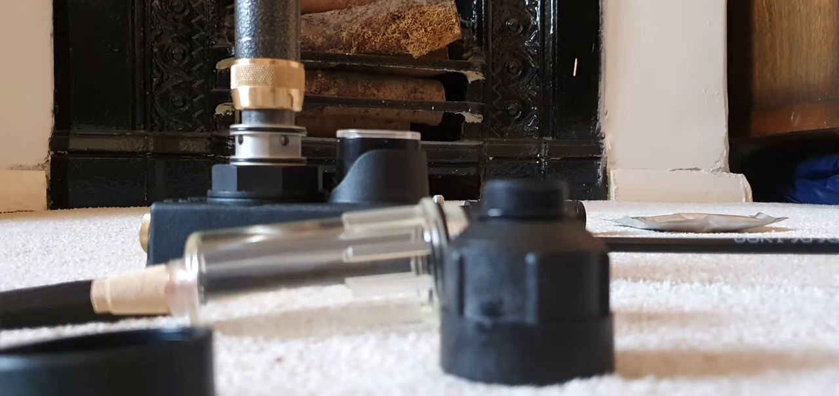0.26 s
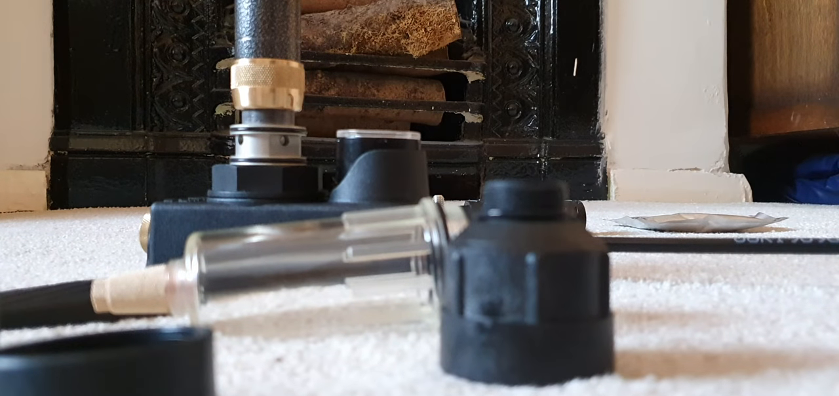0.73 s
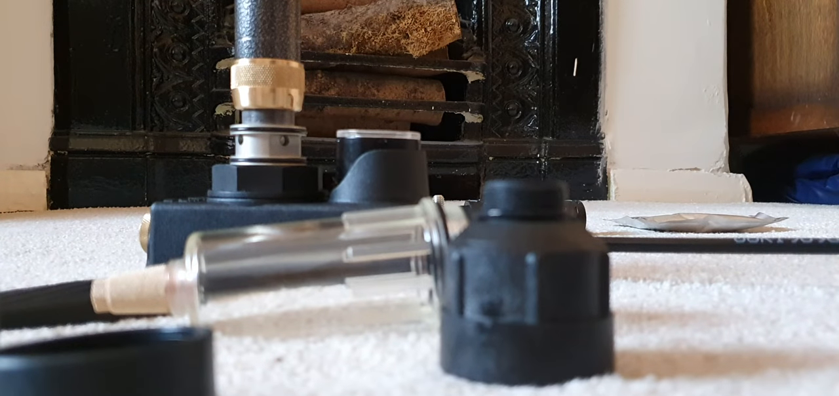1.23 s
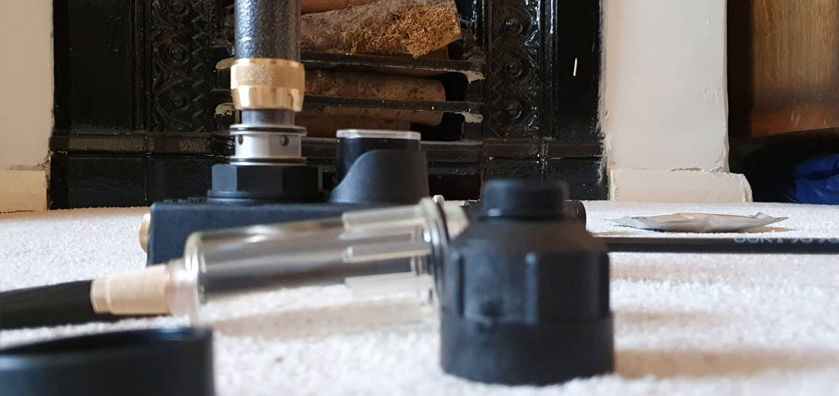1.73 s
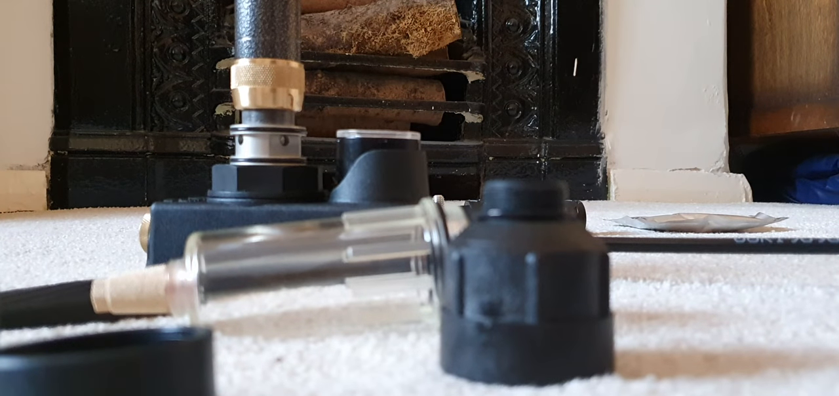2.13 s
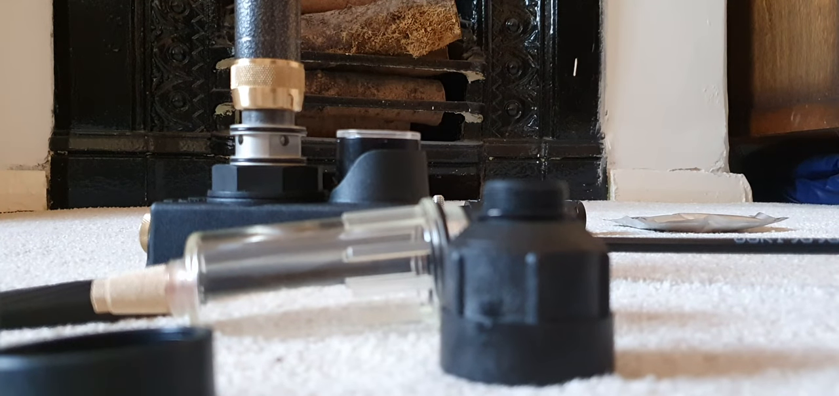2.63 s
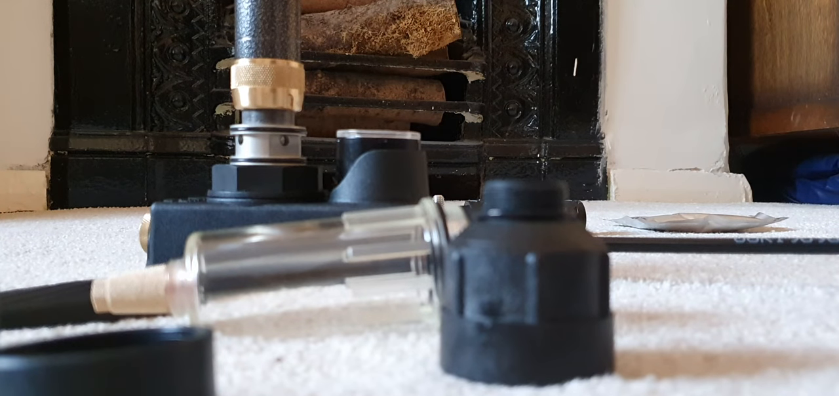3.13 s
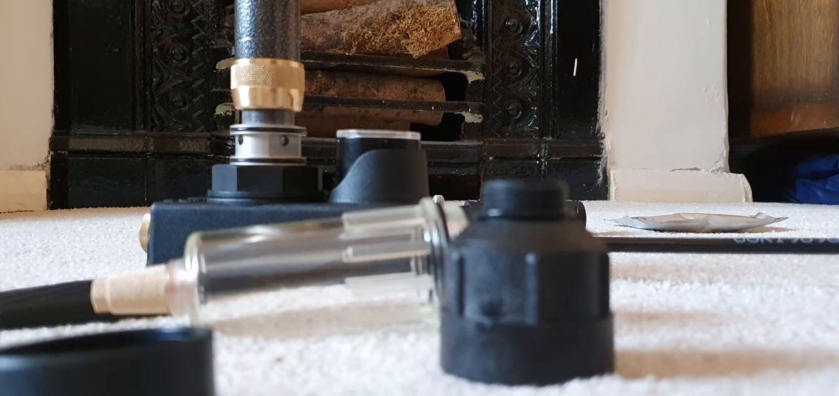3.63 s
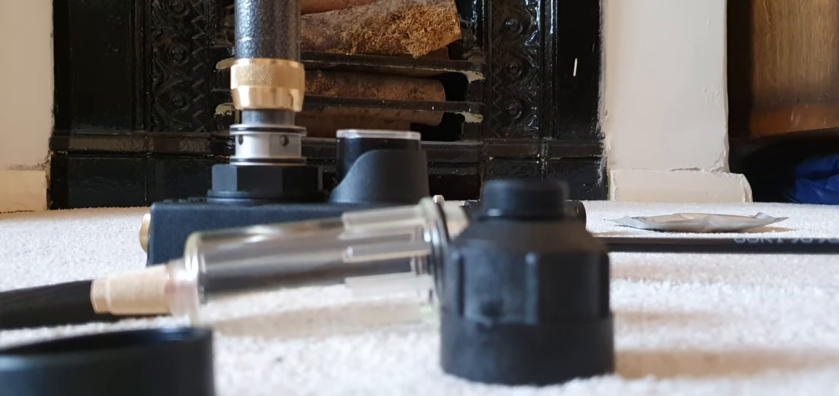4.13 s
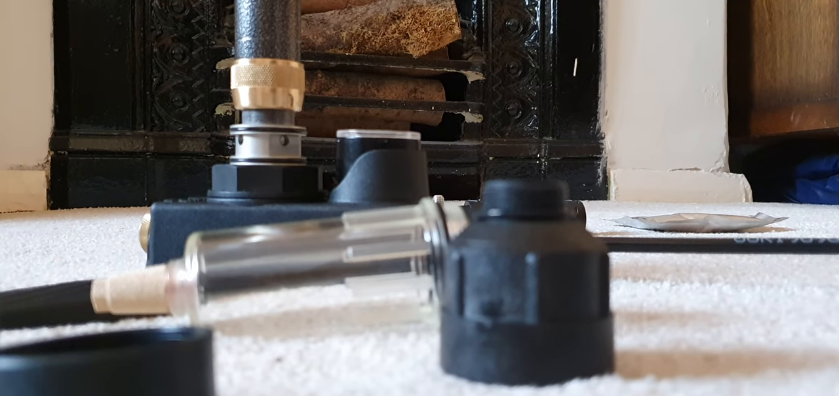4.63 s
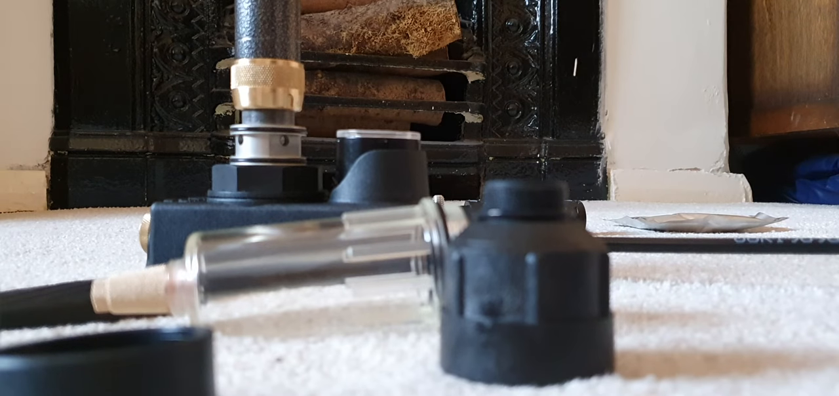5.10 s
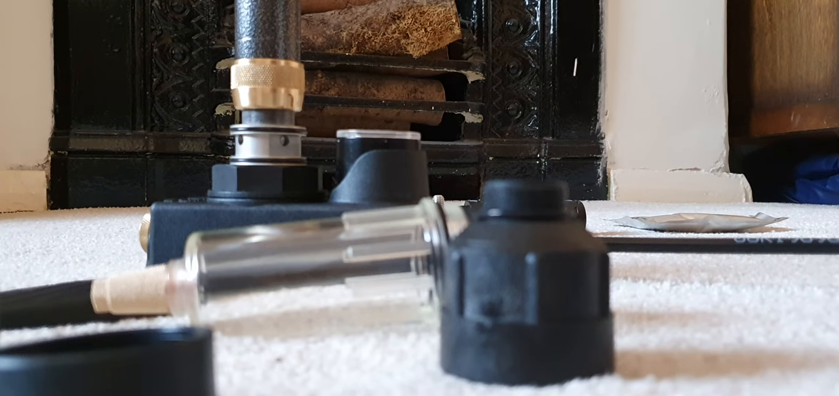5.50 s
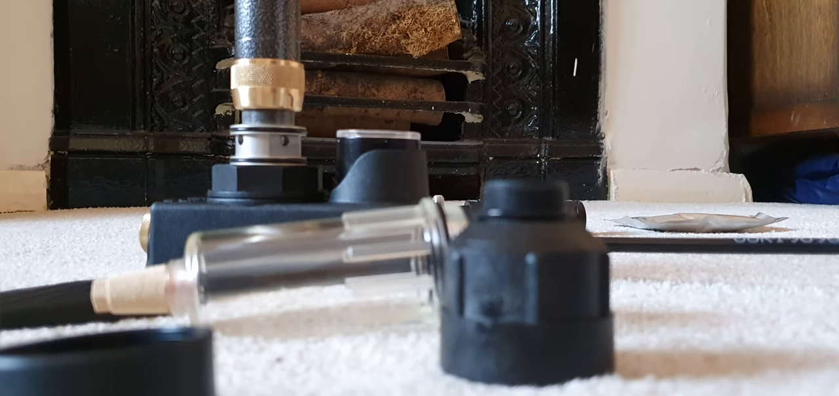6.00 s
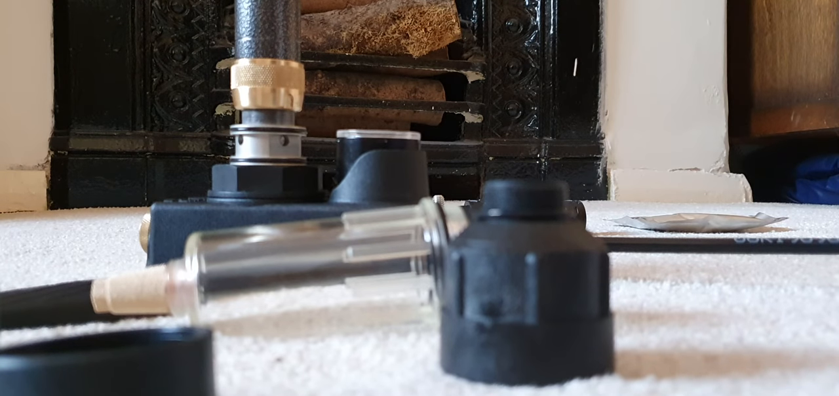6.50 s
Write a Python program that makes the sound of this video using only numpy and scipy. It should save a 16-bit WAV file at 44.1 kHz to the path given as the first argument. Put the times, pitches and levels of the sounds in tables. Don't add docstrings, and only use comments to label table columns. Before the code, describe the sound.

A stiff foil sachet is handled close to a stereo microphone on carpet in a small, quiet room. From 0 to 1.2 s, bright dry snaps stand out over short crackly rubs and tiny creases. Around 1.4-1.7 s the seam rips in dense, jerky bursts with a hollow pouch pop. Lighter rustling follows, with a sharp crack near 2.2 s and a hard cluster of creases at 2.8-3.0 s. From 3.1 to 3.9 s it is almost still, only faint film shifting. A second tear erupts at 4.0-4.5 s, loudest near 4.35 s, crackling and fizzing. Then sparse, soft settling crinkles, a small snap at 5.45 s, light rubbing from 5.9 s, a sharp crack at 6.25 s and a short final pull near 6.5 s. The left side sounds slightly later and duller. Low, beating motor hum, soft rumble, faint hiss and an intermittent thin whine lie underneath.

```python
import sys
import numpy as np
from scipy import signal
from scipy.fft import rfft, irfft, next_fast_len
from scipy.io import wavfile
from scipy.ndimage import map_coordinates

SR = 44100
rng = np.random.default_rng(int(sys.argv[2]) if len(sys.argv) > 2 else 0)


def how_loud(loudness_db):
    steps = np.asarray(loudness_db, float) / 20
    return 10 ** steps


def pcm_store(signal):
    levels = np.round(np.clip(np.atleast_2d(signal), -1, 1) * 32767)
    wavfile.write(sys.argv[1], SR, levels.astype(np.int16).T)


N = 297675


def unit(x):
    return x / np.sqrt(np.mean(x ** 2) + 1e-20)


def peak(x):
    return x / np.abs(x).max()


def along(points, hz):
    f, v = np.transpose(points)
    return np.interp(np.log(hz + 1), np.log(f + 1), v)


def curves(rows, t=None):
    s, *cols = np.transpose(rows)
    when = np.arange(N) / SR if t is None else t
    return [np.interp(when, s, c) for c in cols]


def wobble(rate):
    t = np.arange(0, N + 64, 32)
    knots = rng.standard_normal(N // 100)
    curve = map_coordinates(knots, [t * np.clip(rate, .1, 400) / SR])
    return np.interp(np.arange(N), t, curve)


def causal(colour, size):
    cep = irfft(np.log(how_loud(along(colour, np.fft.rfftfreq(size, 1 / SR)))), size)
    cep[1:size // 2] *= 2
    cep[size // 2 + 1:] = 0
    return np.exp(rfft(cep))


def coloured(x, colour):
    return signal.fftconvolve(x, irfft(causal(colour, size=1024))[None], axes=1)[:, :N]


def resonance(f, hz, width):
    damping = 1j * f * width * hz
    return damping / (hz * hz - f * f + damping)


# f/Hz, likeness/0-1
LIKENESS = [(60, 1), (400, 0.58), (1500, 0.095)]


def still_air(colour):
    m = next_fast_len(N)
    hz = np.fft.rfftfreq(m, 1 / SR)
    turn = np.arccos(np.clip(along(LIKENESS, hz), -1, 1)) / 2
    noise = rfft(rng.standard_normal((2, m))) * how_loud(along(colour, hz))
    mid, side = irfft(noise * [np.cos(turn), np.sin(turn)], m)[:, :N]
    return unit(np.array([mid + side, mid - side]))


# f/Hz, level/dB per Hz
RUMBLE_COLOUR = [(30, -10), (65, 0.48), (95, 0.02), (135, -10), (220, -4), (450, -13), (800, -17),
                 (1300, -35)]
# t/s, level/dB
HOUSE_LEVEL = [(0, -69), (.5, -66), (1.3, -66), (2.2, -66), (2.6, -72.5), (3.1, -65.5), (3.6, -68.5),
               (3.9, -67.5), (4.6, -69), (5.2, -73.5), (5.6, -68), (6, -71), (6.3, -65), (6.75, -65.5)]


def house_rumble():
    level_db = curves(HOUSE_LEVEL)[0] + 2.0 + 1.3 * wobble(2.9)
    return still_air(RUMBLE_COLOUR) * how_loud(level_db + [[-1.4], [1.4]])


# f/Hz, level/dB per Hz
HISS_COLOUR = [(800, -18.5), (1400, -6.5), (3900, -5), (7000, 8), (9000, -9), (11500, -26), (15800, -40)]


def microphone_hiss():
    return still_air(HISS_COLOUR) * how_loud([[-76], [-73]])


# f/Hz, level/dB rms, phase/turns
MOTORS = [
    (49.37, -69, .55),
    (44.11, -71.5, .3),
    (98.76, -81, .87),
]


def motor_hum():
    t = np.arange(N) / SR
    return sum(np.sqrt(2) * how_loud(db) * np.sin(2 * np.pi * (f * t + turns)) for f, db, turns in MOTORS)


# t/s, level/dB
WHINE_LEVEL = [(.8, -82), (1.05, -72), (1.12, -79), (1.19, -70.5), (1.7, -71), (1.83, -64), (1.9, -79),
               (2, -75), (2.3, -80), (2.7, -86.5), (5.94, -92.5), (5.98, -67), (6.03, -89), (6.07, -64),
               (6.12, -70), (6.17, -85), (6.3, -83), (6.34, -64), (6.4, -64), (6.46, -84)]


def motor_whine():
    t = np.arange(N) / SR
    level = how_loud(curves(WHINE_LEVEL)[0] + 3.2 * wobble(18))
    return level * np.sin(2 * np.pi * 767 * t + 1.2 * wobble(12))


def background():
    return house_rumble() + microphone_hiss() + motor_hum() + motor_whine()


# f/Hz, t60/s
ROOM_DECAY = [(300, 0.22), (3000, 0.22), (14000, 0.026)]


def room(x, size=SR // 4, count=27):
    out = np.zeros((2, N + 3 * size))
    for k in range(count + 1):
        hz, t, z = signal.stft(rng.standard_normal((2, size)), SR, nperseg=128)
        fading = z * how_loud(-60 * t / along(ROOM_DECAY, hz)[:, None])
        tail = signal.istft(fading, SR, nperseg=128)[1][:, :size]
        part = x[k * size:(k + 1) * size]
        if len(part):
            wet = signal.fftconvolve(part[None], tail / np.linalg.norm(tail[0]), axes=1)
            out[:, k * size + 160:][:, :wet.shape[1]] += wet
    return out[:, :N]


# f/Hz, level/dB
PHONE_SHADOW = [(60, -7), (380, -1.5), (2380, -6.5), (15000, -11)]
# t/s, left lag/ms, left-right level/dB
HANDS = [
    (0, 0.31, 3),
    (1.2, 0.35, -2.5),
    (2.2, 0.28, 2.5),
    (2.8, 0.37, -2),
    (3.3, 0.43, 2),
    (3.9, 0.391, -0.5),
    (5.2, 0.4, -1.5),
    (6.2, 0.28, 2),
]


def across_phone(x):
    hz, t, z = signal.stft(x[0], SR, nperseg=512)
    lag_ms, pan_db = curves(HANDS, t)
    delay = np.exp(-2j * np.pi * hz[:, None] * lag_ms / 1000)
    z = z * how_loud(along(PHONE_SHADOW, hz)[:, None] + pan_db) * delay
    return np.array([signal.istft(z, SR, nperseg=512)[1][:N], x[1]])


# t/s, peak level/dB, f/Hz, pouch thump/dB rel., fizz/dB rel.
CRACK_EVENTS = [(0.163, -8, 4264, -20.5, -13), (0.4192, -18, 3876, -16, -24), (0.6846, -13, 6570, -36, -16),
                (0.7957, -13.5, 2990, -7, -22), (0.9756, -18.5, 3620, -17, -17),
                (0.9808, -18, 2885, -4, -29), (1.2165, -11, 2520, -18, -13),
                (1.71, -20, 3165, -16.5, -16.5), (2.0445, -30, 3230, -6, -16),
                (2.1393, -16.5, 3580, -14.5, -27), (2.1822, -7, 4540, -28, -10.5),
                (2.8406, -8.5, 5950, -12, -20), (2.8764, -20.5, 2840, -2, -42),
                (2.926, -7.5, 2640, -6.5, -24.5), (2.944, -5.5, 4040, -27, -19),
                (4.0412, -18, 2140, -14, -36), (4.0787, -12, 2290, -2, -17.5),
                (4.151, -18, 4140, -7, -13.5), (4.297, -7.5, 3500, -30, -4), (4.4467, -10, 4780, -12, -19),
                (5.4511, -22.5, 3500, -37, -14), (6.254, -8, 3010, -9, -20)]
# t/s of the top, rustle level/dB, rise/ms per 10 dB, fall/ms per 10 dB, pouch/dB rel.
TEAR_STROKES = [(0.092, -36, 10.5, 36, -20), (0.372, -38.5, 48, 25.5, -12.5),
                (0.436, -27.5, 13.5, 19.5, -12.5), (1.267, -35.5, 4.5, 93.5, -12),
                (1.442, -24, 22.5, 7.5, -10.5), (1.481, -14.5, 18, 25, -17), (1.52, -29, 21.5, 21.5, -14),
                (1.578, -17, 14.5, 15, -12.5), (1.6, -18, 15, 16, -19.5), (1.647, -10.5, 12, 15, -21.5),
                (2.192, -31, 13.5, 27.5, -18.5), (4.2815, -23.5, -1.2, 68, -13),
                (4.305, -21.5, 3.5, 59.5, -10.5), (4.353, -21, 20, 17, -7.5), (4.392, -30.5, 9.5, 18, -15),
                (4.491, -38, 90.5, 36, -15), (6.26, -38, 32.5, 43, -12), (6.512, -35.5, 2, 14.5, -1),
                (6.535, -30.5, 14.5, 24.5, -3)]
# t/s of the top, rustle level/dB, rise/ms per 10 dB, fall/ms per 10 dB
RUB_STROKES = [(0.092, -45, 235, 81), (0.535, -43.5, 51.5, 71.5), (0.703, -41, 46.5, 23.5),
               (0.765, -42.5, 10, 15), (0.814, -37.5, 15.5, 13.5), (0.912, -48.5, 54.5, 110),
               (1.783, -39.5, 265.5, 44), (1.858, -51.5, 45.5, 70), (1.979, -51, 17, 16.5),
               (2.069, -45.5, 25.5, 47.5), (2.313, -46, 129.5, 10.5), (2.432, -44.5, 100.5, 45.5),
               (2.609, -49, 18.5, 60), (2.879, -44, 28.5, 65), (3.02, -53, 27.5, 22),
               (3.198, -59, 300, 112), (3.729, -50, 27.5, 32.5), (3.84, -53, 61, 16.5),
               (3.931, -42.5, 20.5, 38), (4.052, -48.5, 36, 8), (5.012, -59.5, 30.5, 159.5),
               (5.453, -52.5, 30, 40), (5.872, -54.5, 6.5, 19), (5.891, -44.5, 13.5, 36),
               (5.994, -51, 15.5, 111.5), (6.16, -46.5, 112, 87), (6.342, -47.5, 10.5, 7.5),
               (6.423, -42.5, 15, 92), (6.649, -48.5, 33, 23.5)]
# t/s of the top, rustle level/dB, rise and fall/ms per 10 dB
FIDGET_STROKES = [(1.15, -59.5, 22), (1.205, -46.5, 7.5), (4.146, -52, 10), (3.371, -66, 60.5),
                  (3.46, -60, 19.5), (3.57, -62, 73.5), (4.612, -57, 48), (4.822, -51.5, 44),
                  (4.894, -58, 1.5), (5.161, -57, 8), (5.311, -64, 31), (5.558, -63.5, 53.5),
                  (5.72, -68, 63.5), (5.795, -61.5, 28.5), (6.722, -61.5, 63)]
# t/s, level/dB rel. to the rustle
PRESS = [(0, -12), (.7, -5.5), (.9, -14), (1.8, -12.5), (2.4, -8.5), (2.88, -15), (3.02, -15), (3.25, -2),
         (3.65, -23), (3.84, -7), (3.93, -15), (4.05, -5), (4.7, -17.5), (5.1, -4.5), (5.6, 0), (5.9, -10),
         (6.2, -12), (6.7, 4)]


def moves():
    def press_db(s):
        return curves(PRESS, s)[0]

    rubs = [(s, db, rise, fall, press_db(s)) for s, db, rise, fall in RUB_STROKES]
    fidgets = [(s, db, ms, ms, press_db(s)) for s, db, ms in FIDGET_STROKES]
    shivers = [(s + 0.0015, db - 37, 2.3, 43.7, -5.5) for s, db, *_ in CRACK_EVENTS]
    return TEAR_STROKES + rubs + fidgets + shivers


def strokes():
    s, db, rise_ms, fall_ms, pouch_db = np.transpose(moves())[:, :, None]
    fizz_db = -13 + 0.01 * (db - db.mean())
    t = np.arange(0, N / SR + .002, .001)
    u = 1000 * (t - s) / np.clip(np.where(t < s, rise_ms, fall_ms), .5, 300)
    shape_db = db - 10 * (np.sqrt(u * u + .25) - .5)
    power = [np.sum(how_loud(2 * (shape_db + rel)), axis=0) for rel in (0, pouch_db, fizz_db)]
    return [np.interp(np.arange(N) / SR, t, 10 * np.log10(p + 1e-12)) for p in power]


def crackle(per_s, spread_db, own):
    luck = rng.random((3, N)) * SR / per_s + 1e-6
    hit = luck < 1
    slips = rng.standard_normal((3, N), dtype=np.float32) * hit
    slips[hit] *= how_loud(-spread_db * np.log(luck[hit]))
    own = np.clip(own, 0, 1)
    return unit(np.sqrt(1 - own) * slips[0] + np.sqrt(own) * slips[1:])


# f/Hz, sharpness/Q
PATCHES = [(2700, 1.2), (3400, 0.25), (4300, 1.6), (5600, 3.2), (7000, 7.1)]


def facets(hiss, grit, per_s, spread_db, own):
    total = 0
    for hz, sharpness in PATCHES:
        b, a = signal.iirpeak(hz, sharpness, SR)
        slips = np.sqrt(1 - grit) * hiss + np.sqrt(grit) * crackle(per_s, spread_db, own)
        grip_db = 1.6 * wobble(6) + 12 * (grit - .45) * np.log2(hz / 4000)
        total = total + how_loud(grip_db) * unit(signal.lfilter(b, a, slips))
    return unit(total)


# t/s, level/dB rel. to the rustle
LOOSENESS = [(0, -7), (1.1, -6.5), (1.45, -13.5), (1.95, -14.5), (2.15, -7.5), (2.65, -11), (3.1, -9),
             (4.4, -9), (4.65, -19.5), (5.35, -31), (5.5, -10), (6.75, -7.5)]
# f/Hz, level/dB per Hz
TAUT_COLOUR = [(1700, -55), (2350, -9), (2700, -0.5), (4200, 0), (4800, -4.5), (7300, -7), (8200, -12),
               (9500, -48.5)]
# f/Hz, level/dB per Hz
SLACK_COLOUR = [(900, -31.5), (1300, -16.5), (2100, -6.5), (2900, -24.5)]
# f/Hz, level/dB per Hz
POUCH_COLOUR = [(60, -12.5), (300, -7), (600, -1), (1000, 1.5), (1500, -21.5), (2200, -43.5)]
# f/Hz, level/dB per Hz
FIZZ_COLOUR = [(6500, -28), (8500, -0.5), (11000, -5.5), (13000, -6.5), (16000, -17.5)]


def rustle():
    film_db, pouch_db, fizz_db = strokes()
    slack_db = curves(LOOSENESS)[0]
    grit = np.clip(0.33 + 0.011 * (film_db + 52.5), .05, .9)
    clumps = how_loud(2.07 * wobble(85))
    hiss = crackle(per_s=26000, spread_db=1.5, own=0.62)
    rough = crackle(per_s=8700, spread_db=2.5, own=0.55)
    slips = clumps * (np.sqrt(1 - grit) * hiss + np.sqrt(grit) * rough)
    rings = clumps * facets(hiss, grit, per_s=700, spread_db=3.4, own=0.9)
    soft = clumps * how_loud(2.4 * wobble(70)) * crackle(per_s=1400, spread_db=2.2, own=.15)
    film = how_loud(film_db - 1.73) * unit(coloured(rings, TAUT_COLOUR))
    slack = how_loud(film_db + slack_db - 4.0) * unit(coloured(slips, SLACK_COLOUR))
    pouch = how_loud(pouch_db - 4.5) * unit(coloured(0.56 * slips + soft, POUCH_COLOUR))
    fizz = how_loud(fizz_db - 1.3) * unit(coloured(slips, FIZZ_COLOUR))
    return film + slack + pouch + fizz


# t/s, peak level/dB
TICK_EVENTS = [(1.318, -23.5), (1.334, -24), (2.644, -30.5), (2.67, -43), (3.033, -25.5), (4.1542, -16.5),
               (4.159, -13), (4.387, -13), (4.485, -19.5), (4.491, -20), (4.51, -18), (1.4158, -23),
               (1.4218, -18), (1.5768, -12), (1.631, -16), (1.6505, -18), (0.0762, -31), (1.272, -24),
               (1.2768, -22), (1.342, -27), (1.385, -26), (1.797, -25), (4.907, -44), (6.4116, -34),
               (6.5101, -31), (4.649, -33.5), (4.802, -31.5), (4.9366, -43.5), (4.947, -40.5), (5.195, -48),
               (5.234, -40.5), (5.84, -50), (6.1556, -34), (6.5211, -25), (6.632, -30)]
# t/s, peak level/dB, f/Hz
CREASE_EVENTS = [(0.2925, -42, 1880), (0.3558, -27, 3300), (0.464, -25, 3200), (0.501, -28.5, 2410),
                 (0.8073, -20, 3200), (0.817, -29, 2950), (0.8655, -33, 2710), (0.889, -32, 2670),
                 (0.928, -35, 3500), (0.995, -29, 2330), (1.006, -26.5, 2460), (1.032, -29.5, 2520),
                 (1.0666, -31, 3420), (1.1355, -38, 2900), (1.264, -26, 3500), (1.2982, -25, 2950),
                 (1.3514, -39, 3620), (2.2218, -26, 2960), (2.3813, -36.5, 2800), (2.751, -42, 3000),
                 (2.8866, -23, 3380), (3.0077, -35, 3140), (3.0422, -31.5, 3500), (3.2247, -34, 6330),
                 (5.4143, -31, 3680), (6.024, -27, 3750), (6.03, -28.5, 3650), (6.237, -23, 3050),
                 (0.046, -44, 3040), (0.3391, -32, 3100), (0.4435, -24, 3130), (0.559, -33, 3020),
                 (0.6694, -38, 2820), (0.696, -25.5, 2270), (0.7563, -33, 2910), (1.283, -23, 2600),
                 (1.757, -29, 3100), (1.781, -26, 3280), (2.159, -24, 2980), (2.196, -19, 2900),
                 (2.208, -24, 3180), (2.431, -31, 3500), (4.0545, -37, 2070), (4.087, -27, 2150),
                 (4.0925, -31, 2300), (4.402, -21, 2400), (4.427, -27, 2300), (5.8676, -45, 2960),
                 (5.8848, -36, 3040), (5.987, -47.5, 3070), (6.3931, -50, 3000)]
# t/s, thump peak level/dB, thump f/Hz
POP_EVENTS = [(0.1128, -34, 750), (0.252, -43.5, 320), (0.6667, -36, 665), (0.7707, -36, 815),
              (0.9482, -39, 720), (1.368, -31.5, 720), (1.552, -11, 659), (2.4071, -27, 1110),
              (2.425, -34, 640), (2.9526, -17, 980), (3.2477, -51, 405), (3.7295, -30, 775),
              (3.84, -44, 507), (4.5171, -16.5, 577), (4.967, -53, 600), (5.157, -52, 695),
              (5.352, -57, 596), (5.4467, -28, 590), (6.1482, -32, 960), (6.2212, -34, 716),
              (6.248, -24, 375), (0.429, -26.5, 610), (0.444, -26.5, 654), (1.5451, -25.5, 714),
              (2.893, -30, 1000), (2.9472, -25.5, 503), (4.471, -32.5, 700)]
# t/s, peak level/dB
RIP_EVENTS = [(1.4667, -7), (1.484, -11), (1.4905, -11.5), (1.5925, -12), (1.611, -12.5), (1.6574, -5),
              (1.663, -7), (4.2794, -21.5), (4.3319, -6), (4.353, 2.5), (4.3623, -6.5), (4.3689, -6)]
# f/Hz, level/dB rel., f/Hz, level/dB rel.
CRACK_NEIGHBOURS = [(2885, -12, 6200, -8), (2900, 0, 5200, -14), (4960, -5, 3170, -23),
                    (2090, -3, 4070, -8), (2800, -1, 1760, -6), (1860, 1, 4800, -17), (4960, -1, 7630, 2),
                    (4160, -5, 1700, -9), (2600, 4, 4650, -12), (4140, 2, 6000, -20), (2410, 18, 3500, 3),
                    (4120, -5, 9300, -4.5), (3880, 3, 1440, -19), (4240, 4, 7700, -12),
                    (5700, -4, 2550, -9.5), (3165, -6.5, 5400, -17), (5500, -5.5, 4430, -6.5),
                    (5100, -3, 3100, -9.5), (7620, -6, 5170, -6), (6420, -4.5, 1870, -21),
                    (6245, -2, 5400, -4), (4264, 4, 7400, -9)]
# f ratio, level/dB rel., f ratio, level/dB rel.
SMALL_NEIGHBOURS = (1.53, -4.5, 1.1, -9)


def buckles():
    pouch_hz, pop_thump_db = 770, 4.5
    small = [(s, db, 4060, -23, pouch_hz, -21.5) for s, db in RIP_EVENTS]
    small += [(s, db - pop_thump_db, 3300, pop_thump_db, hz, -14.5) for s, db, hz in POP_EVENTS]
    small += [(s, db, hz, -18, pouch_hz, -16) for s, db, hz in CREASE_EVENTS]
    small += [(s, db, 3930, -36, pouch_hz, -32.5) for s, db in TICK_EVENTS]
    cracks = [(s, db, hz, thump_db, pouch_hz, fizz_db, near)
              for (s, db, hz, thump_db, fizz_db), near in zip(CRACK_EVENTS, CRACK_NEIGHBOURS)]
    return cracks + [(*row, np.multiply(SMALL_NEIGHBOURS, (row[2], 1, row[2], 1))) for row in small]


def snaps(size=1024):
    out = np.zeros((2, N + size))
    t, f = np.arange(size) / SR, np.fft.rfftfreq(size, 1 / SR)
    film = causal(TAUT_COLOUR, size) + 0.93 * causal(SLACK_COLOUR, size)
    fizz = causal(FIZZ_COLOUR, size)
    note_width = 0.16
    for s, db, hz, thump_db, thump_hz, fizz_db, near in buckles():
        chance = rng.standard_normal((3, size))
        t60 = 0.0065 * np.exp(0.1 * chance[0, -1])
        envelope = how_loud(-60 * t / t60) * (1 - np.exp(-t / 0.0007))
        spray = (0.6 * chance[0] + 4.1 * chance[1:]) * envelope
        burst = rfft(spray + 7 * (t == t[6]))
        burst *= 1 + 0.084 * np.exp(-2j * np.pi * f * 0.000706)

        patches = resonance(f, hz, note_width) ** 2
        for near_hz, near_db in np.reshape(near, (2, 2)):
            patches = patches + how_loud(near_db) * resonance(f, near_hz, note_width * np.sqrt(hz / near_hz)) ** 2
        note = how_loud(-1) * peak(irfft(patches)) + how_loud(-3.5) * peak(irfft(burst * film))
        spit = peak(irfft(burst * fizz))

        push = np.exp(-2j * np.pi * f * 0.00047) * np.sign(chance[1, -1])
        hollow_hz = thump_hz * np.exp(0.082 * chance[2, -1])
        thump = peak(irfft(push * resonance(f, hollow_hz, 1.0) ** 2))
        lurch = peak(irfft(push * resonance(f, 280, 2.5) ** 2))
        thump = thump + how_loud(-10) * lurch * np.hanning(2 * size)[size:]
        snap = note + how_loud(thump_db - 1.5) * thump + how_loud(fizz_db + 3.5) * spit
        out[:, round(s * SR):][:, :size] += how_loud(db - 2.5) * snap
    return out[:, :N]


def scene():
    foil = rustle() + snaps()
    return across_phone(foil) + how_loud([[-19], [-18]]) * room(foil[1]) + background()


def band_limit(x):
    return signal.sosfilt(signal.butter(12, 17020, fs=SR, output="sos"), x)


def record(dry):
    bass_cut = signal.butter(3, 36, "highpass", fs=SR, output="sos")
    top_cut = signal.ellip(7, .5, 36, 15700, fs=SR, output="sos")
    x = signal.sosfiltfilt(bass_cut, dry)
    x = x / (1 + np.abs(x / .96) ** 6) ** (1 / 6)
    return band_limit(signal.sosfilt(top_cut, x))


dry = scene()
out = record(dry)
pcm_store(out)
```